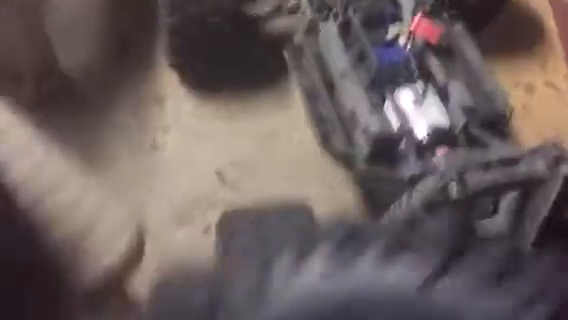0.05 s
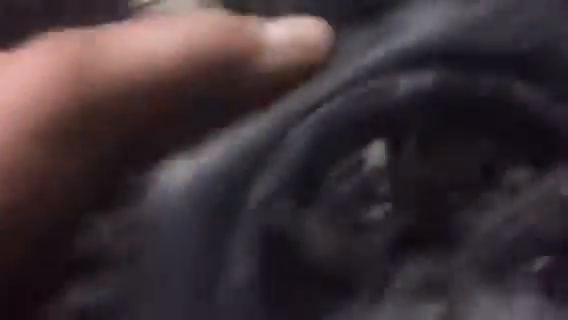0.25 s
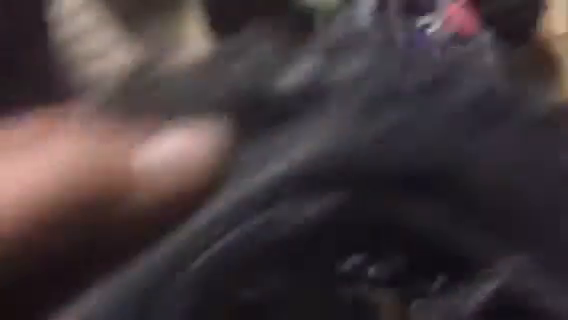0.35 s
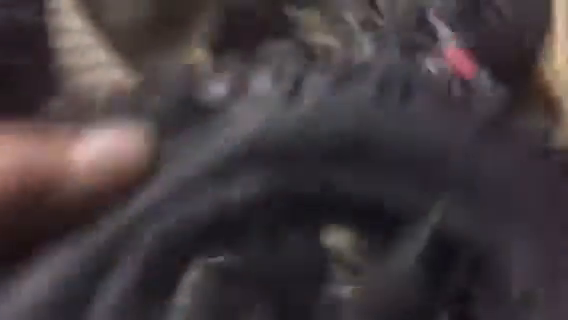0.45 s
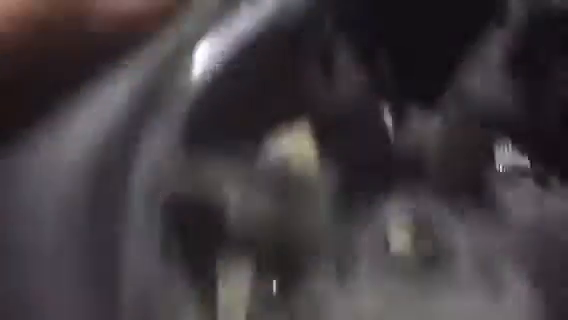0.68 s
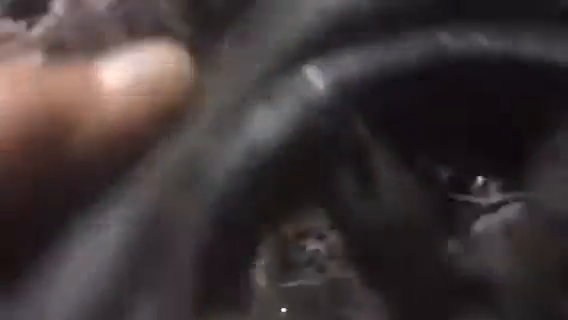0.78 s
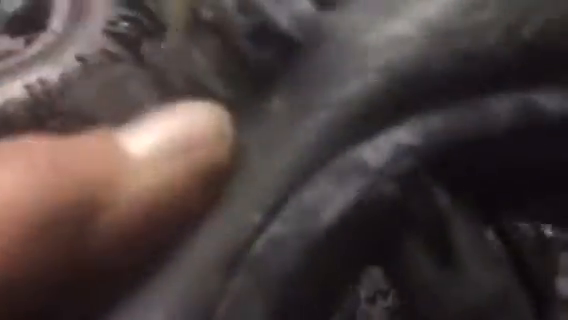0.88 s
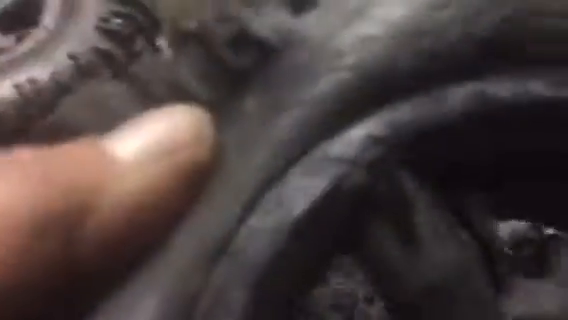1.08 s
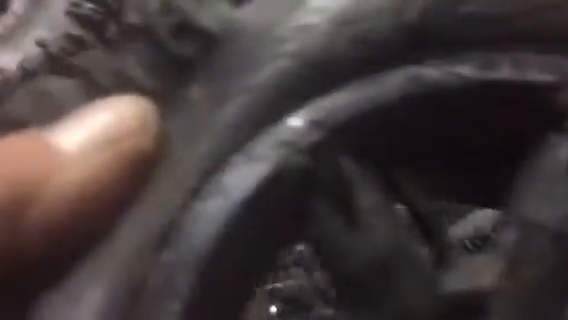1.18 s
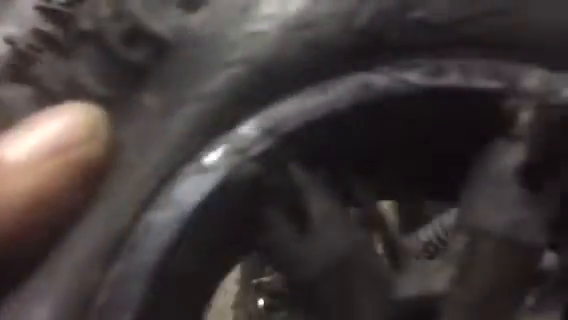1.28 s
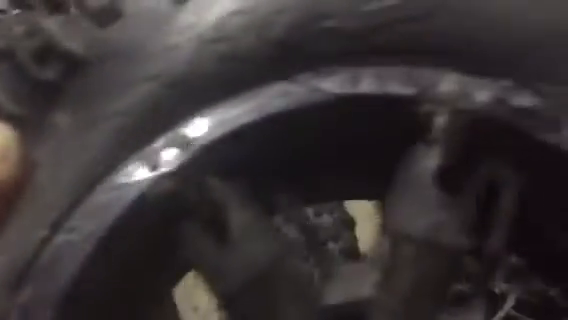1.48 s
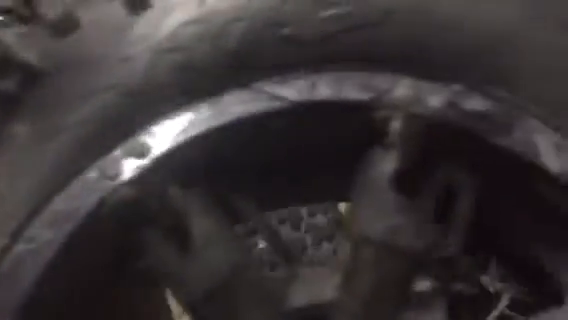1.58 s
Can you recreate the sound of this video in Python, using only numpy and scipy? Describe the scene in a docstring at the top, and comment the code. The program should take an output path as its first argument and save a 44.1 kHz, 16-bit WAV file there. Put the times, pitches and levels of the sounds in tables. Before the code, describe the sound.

A rubber tire on a plastic wheel is turned by hand, right against the microphone in a quiet room. Skin scrapes over it in short bursts, mixed with dull bumps and low rumble, then the handling softens.

```python
"""Tire turned by hand

A quiet room, one microphone, right up against a rubber tire on a plastic wheel. Skin drags over the
rubber in short strokes of tiny stick-slips that excite resonances of tire and wheel and a surface hiss.
The tire bumps dully against the hand, the tread catches now and then, and the shifting grip keeps up
a low rumble."""
import sys
import numpy as np
from scipy import signal
from scipy.fft import rfft, irfft
from scipy.io import wavfile
from scipy.ndimage import uniform_filter1d

SR = 44100
rng = np.random.default_rng(int(sys.argv[2]) if len(sys.argv) > 2 else 0)


def persist_wave(psi):
    """Save psi, clipped to +-1, as 16-bit WAV."""
    counts = np.round(np.clip(psi, -1, 1) * 32767).astype(np.int16)
    wavfile.write(sys.argv[1], SR, np.atleast_2d(counts).T)


N = 72765


def from_db(db):
    """Decibels to gain."""
    return 10 ** (np.asarray(db) / 20)


def rms_one(x):
    """Scale to unit rms."""
    return x / np.sqrt(np.mean(x ** 2) + 1e-20)


def seconds():
    """The time of every sample."""
    return np.arange(N) / SR


def white():
    """White noise with a spread of 1."""
    return rng.standard_normal(N)


def drift(hz):
    """Random wander, mostly slower than hz; rms 1."""
    pole = np.exp(-2 * np.pi * hz / SR)
    wander = signal.lfilter([1], [1, -2 * pole, pole * pole], rng.standard_normal(2 * N))
    return rms_one(wander[N:])


def resonate(x, hz, width_hz):
    """A damped resonance, applied twice for steep skirts."""
    radius = np.exp(-np.pi * width_hz / SR)
    b = [1 - radius, 0, radius - 1]
    a = [1, -2 * radius * np.cos(2 * np.pi * hz / SR), radius * radius]
    return signal.lfilter(b, a, signal.lfilter(b, a, x + 1e-18))


def ring_modes(excite, modes, force):
    """Each resonance gets its own excitation, scaled by the force; a force of 1 gives about rms 1."""
    out, power = 0, 0
    for hz, width_hz, db in modes:
        drive = excite()
        unforced_rms = np.std(resonate(drive, hz, width_hz))
        out += from_db(db) * resonate(drive * force, hz, width_hz) / unforced_rms
        power += from_db(db) ** 2
    return out / np.sqrt(power)


# Spectrum of the quiet room: f/Hz, relative level/dB
ROOM_SPECTRUM = [(30, 3.5), (120, 5.5), (200, -10), (300, -13), (420, -8), (690, -18.5), (890, -2.5),
                 (1100, -16.5), (1350, -12.5), (2000, -17.5), (2450, -24), (2850, -32), (3300, -30),
                 (4000, -36), (5700, -35.5), (8000, -41), (15000, -46)]


def room_tone(level_db=-48):
    """Steady, dull air of the room behind the tire."""
    hz, db = np.transpose(ROOM_SPECTRUM)
    bin_hz = np.maximum(np.fft.rfftfreq(N, 1 / SR), 1)
    colour = from_db(np.interp(np.log(bin_hz), np.log(hz), db))
    return from_db(level_db) * rms_one(irfft(rfft(white()) * colour, N))


# The tire's lowest resonances: f/Hz, width/Hz, relative level/dB
RUMBLE_MODES = [(41.7, 32, -1.5), (65.1, 38.4, 4.5), (93.8, 27.7, -5)]
# Course of the rumble as the grip shifts: t/s, relative level/dB
GRIP_LEVELS = [(0, -45), (.16, -44.5), (.22, -36.5), (.31, -31.5), (.36, -37), (.47, -40), (.62, -36.5),
               (.69, -41.5), (0.771, -31.5), (.88, -43), (.94, -34), (1.09, -34), (1.17, -40), (1.31, -45),
               (1.38, -41), (1.54, -47), (1.65, -41)]


def grip_rumble(gain_db=4, even_over_s=0.0507):
    """The shifting grip keeps the tire's lowest resonances moving."""
    rumble = ring_modes(white, RUMBLE_MODES, force=1)
    local_power = uniform_filter1d(rumble ** 2, int(even_over_s * SR))
    evened = rumble / np.sqrt(local_power + 0.005)
    grip_db = np.interp(seconds(), *np.transpose(GRIP_LEVELS))
    return evened * from_db(gain_db + grip_db)


# Resonances of the plastic wheel, rung by catches and rubbing: f/Hz, width/Hz, relative level/dB
WHEEL_MODES = [(954, 240, -3.5), (1080, 220, -5.5), (1462, 450, -2), (1704, 170, 1), (1839, 210, -0.5),
               (2046, 280, 0), (2376, 280, -4.5), (2685, 550, -11.5)]
# Small catches of the tread on the skin: t/s, starting level/dB
TREAD_CATCHES = [(0.513, -45), (0.7222, -31), (0.7755, -33.5), (0.939, -32)]


def tread_catches(t60_s=0.012):
    """The tread snags and lets go with a short tick in the wheel."""
    force = 0
    for start, db in TREAD_CATCHES:
        t = seconds() - start
        force += (t >= 0) * from_db(db - 60 * np.maximum(t, 0) / t60_s)
    return ring_modes(white, WHEEL_MODES, force)


# Bumps against the hand, a firmer contact ringing higher: t/s, envelope peak level/dB, f/Hz
HAND_BUMPS = [(0.212, -19, 98.4), (0.2662, -9.5, 167.4), (0.271, -8.5, 76), (0.382, -18.5, 62),
              (0.512, -26, 400), (0.533, -15.5, 55.6), (.579, -22, 315), (0.584, -18.5, 116),
              (0.6011, -25.5, 440), (0.617, -22, 56.4), (.659, -28.5, 80), (0.722, -16.5, 72),
              (0.766, -23.5, 70), (0.791, -30.5, 100), (.904, -19.5, 206), (.928, -16, 58),
              (0.992, -16.5, 211), (1.027, -21, 68.5), (1.116, -19, 97.2), (1.251, -26.5, 72),
              (1.449, -29.5, 63)]


def hand_bumps(swell_cycles=0.72, sharpness=3.25):
    """Soft contacts swell and die within a few cycles in the damped rubber."""
    out = 0
    for start, db, hz in HAND_BUMPS:
        cycles = np.maximum(seconds() - start, 0) * hz
        age = cycles / swell_cycles
        envelope = (age * np.exp(1 - age)) ** sharpness
        out -= from_db(db) * envelope * np.sin(2 * np.pi * cycles)
    return out


def stick_slips(per_s=5000, spread_db=3, sliding_gain=0.4):
    """Dense stick-slip clicks of uneven size over smooth sliding noise."""
    sizes = from_db(spread_db * np.minimum(rng.exponential(1, N), 4))
    signs = rng.choice([-1, 1], N)
    slipping = rng.random(N) < per_s / SR
    return rms_one(sizes * signs * slipping) + sliding_gain * white()


def stroke_pressure(start, rise, hold, fall, sag_db, fall_db=28):
    """Pressure builds, sags or grows while the skin slides, then lets go."""
    t = seconds() - start
    built = np.clip(t / rise, 0, 1) ** 1.28  # slowly at first
    held = np.clip((t - rise) / hold, 0, 1)
    released = np.maximum(t - rise - hold, 0) / fall
    return built * from_db(-sag_db * held - fall_db * released)


# Resonances that the slips excite, from low to high: f/Hz, width/Hz, relative level/dB
JUDDER_MODES = [(124.5, 62.6, 2.5), (194, 103, -0.5), (291.3, 68, -9.5)]
HOLLOW_MODES = [(337, 60, -4.5), (414, 160, 1), (513, 126, -3.5), (666, 300, -9.5)]
RASP_MODES = [(3100, 540, -0.75), (3690, 1700, -1.3)]
HISS_MODES = [(5280, 1230, 0.5), (6560, 1800, 0), (7800, 1100, -9.5), (8800, 1400, -9.5)]
SIZZLE_MODES = [(11370, 1200, 0), (12800, 1300, -4), (14500, 1600, -11)]
# Strokes of skin on rubber, right at the microphone: t/s, rise/s, hold/s, fall/s,
# sag over the hold/dB (negative grows), then level/dB of judder, hollow, wheel, rasp and hiss
SKIN_STROKES = [ (0.156, 0.035, 0.088, 0.056, -7, -41, -58, -63, -96, -80),
                (0.261, 0.0095, 0.021, 0.061, -2.5, -26.5, -29, -35, -50.5, -48.5),
                (0.291, 0.011, 0.0094, 0.051, 0, -29.5, -27.5, -33, -58.5, -49.5),
                (0.483, 0.0084, 0.03, .016, -1, -40, -58.5, -54, -70, -84),
                (0.522, .016, 0.014, 0.048, 0, -37, -42.5, -54, -57, -70),
                (0.586, 0.016, 0.0089, 0.023, 3.5, -37, -25.5, -34, -56, -51.5),
                (0.668, 0.013, 0.049, 0.0072, -13, -43, -53, -58, -84, -69.5),
                (0.724, 0.0087, 0.025, 0.037, 0, -48, -36, -41.5, -57.5, -53.5),
                (.750, 0.02, 0.021, 0.078, -1, -29.5, -37, -44.5, -53, -57.5),
                (0.898, 0.0075, 0.11, 0.062, 5, -26, -36.5, -36, -64, -50.5),
                (0.911, 0.0077, 0.0039, 0.1, -1, -45, -33.5, -31.5, -51.5, -43.5),
                (1.026, 0.013, 0.037, 0.031, -3.5, -33.5, -50, -48.5, -85, -62),
                (1.069, 0.024, 0.028, 0.0071, 7, -28.5, -43, -43.5, -70, -56),
                (1.223, 0.044, 0.016, .030, 1, -45, -61.5, -78, -74.5, -90),
                (1.333, 0.0095, 0.017, 0.016, 1, -41.5, -63, -88, -78, -97)]


def skin_rubbing(flutter_hz=88, flutter_db=0.5, hiss_lag_s=0.0015):
    """Each stroke drives the resonances in its own balance; the grip flutters, hard strokes sizzle."""
    pressures = np.array([stroke_pressure(*stroke[:5]) for stroke in SKIN_STROKES])
    gains = from_db([stroke[5:] for stroke in SKIN_STROKES]).T
    flutter = from_db(flutter_db * drift(flutter_hz))
    # Overlapping strokes add in power.
    judder, hollow, wheel, rasp, hiss = np.sqrt(gains ** 2 @ pressures ** 2) * flutter
    # Hiss needs sliding speed, so it swells a little later.
    lag = np.exp(-1 / (hiss_lag_s * SR))
    hiss = signal.lfilter([1 - lag], [1, -lag], hiss + 1e-18)
    sizzle = from_db(-62.5) * (hiss / from_db(-44)) ** 1.14  # gains 1.14 dB per dB of hiss
    groups = [(JUDDER_MODES, judder), (HOLLOW_MODES, hollow), (WHEEL_MODES, wheel),
              (RASP_MODES, rasp), (HISS_MODES, hiss), (SIZZLE_MODES, sizzle)]
    return sum(ring_modes(stick_slips, modes, force) for modes, force in groups)


def scene():
    """Hand and tire close to one microphone, the room behind them."""
    return (skin_rubbing() + hand_bumps() + tread_catches() + grip_rumble() + room_tone())[None]


def record(dry, low_cut_hz=34, high_cut_hz=15340):
    """The microphone signal passes a gentle low cut and a steep high cut."""
    low_cut = signal.butter(2, low_cut_hz, "high", fs=SR, output="sos")
    high_cut = signal.ellip(10, 0.1, 80, high_cut_hz, fs=SR, output="sos")
    return signal.sosfilt(high_cut, signal.sosfilt(low_cut, dry))


dry = scene()
out = record(dry)
persist_wave(out)
```